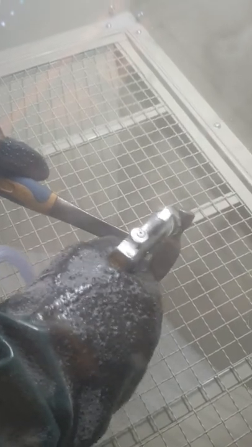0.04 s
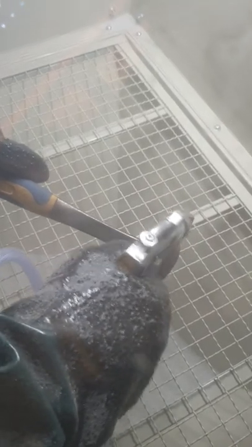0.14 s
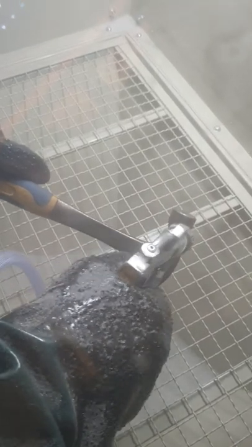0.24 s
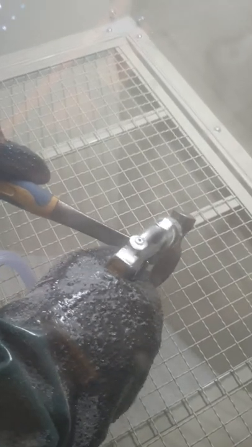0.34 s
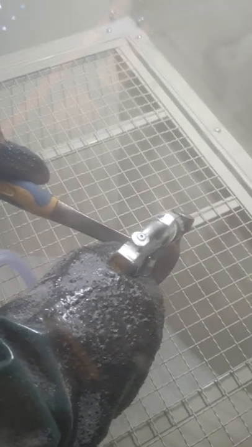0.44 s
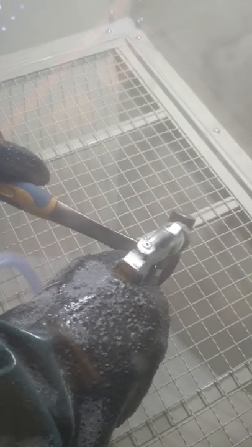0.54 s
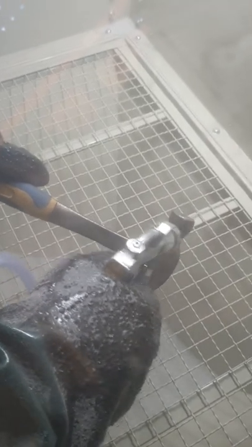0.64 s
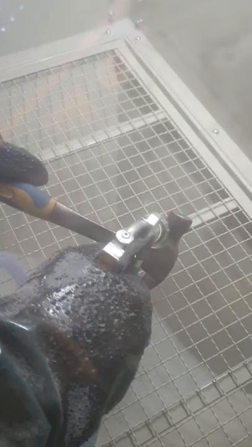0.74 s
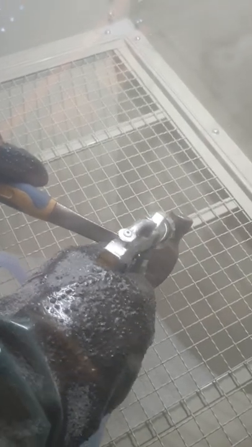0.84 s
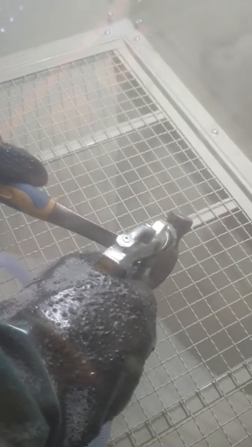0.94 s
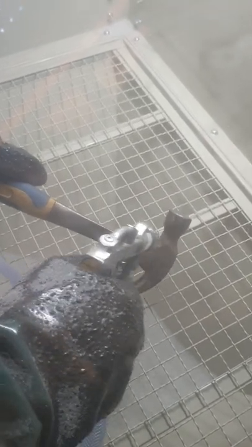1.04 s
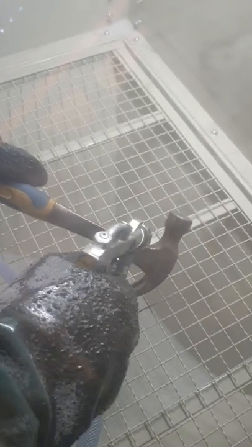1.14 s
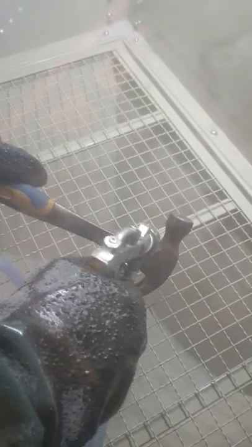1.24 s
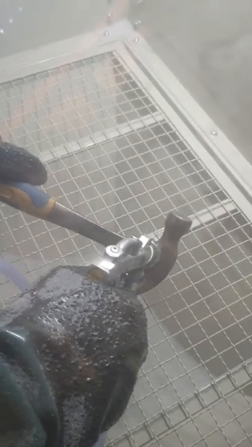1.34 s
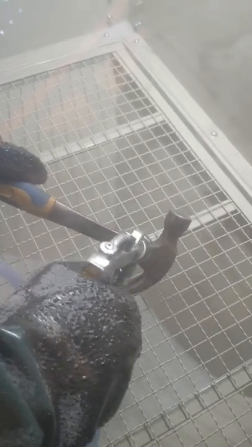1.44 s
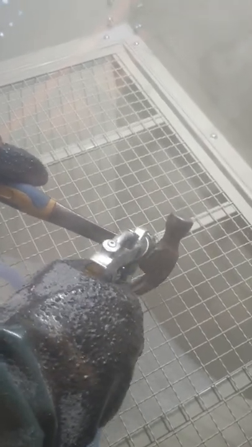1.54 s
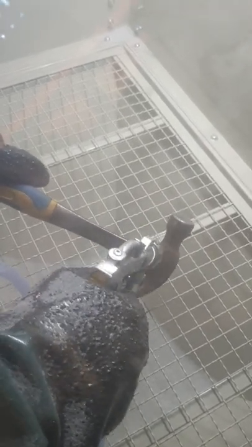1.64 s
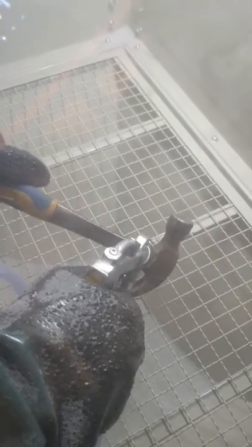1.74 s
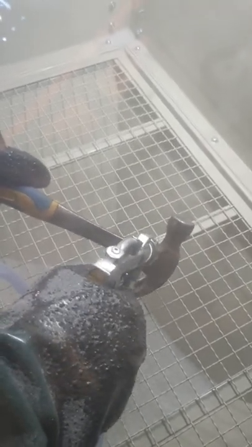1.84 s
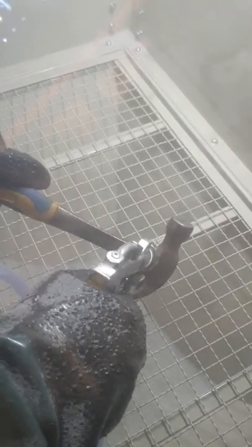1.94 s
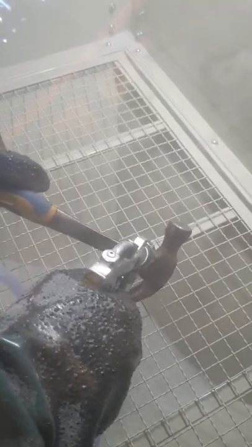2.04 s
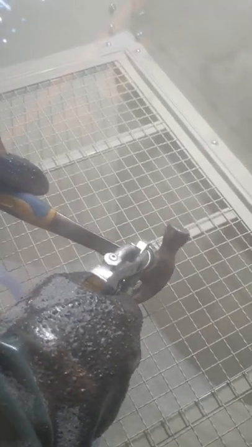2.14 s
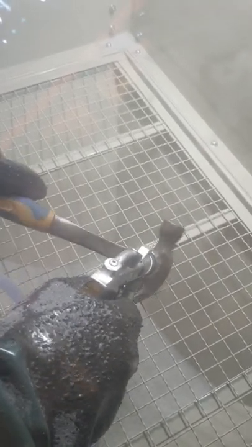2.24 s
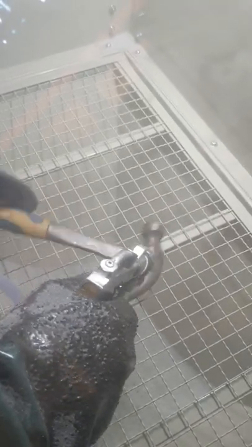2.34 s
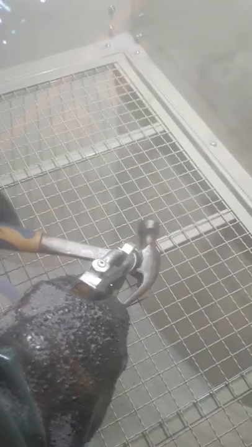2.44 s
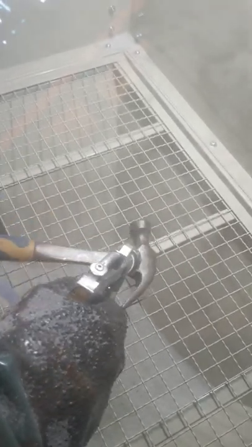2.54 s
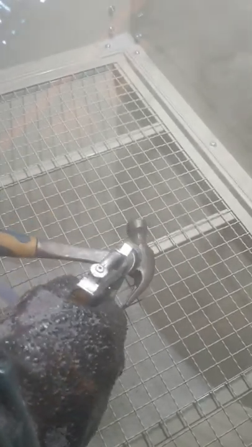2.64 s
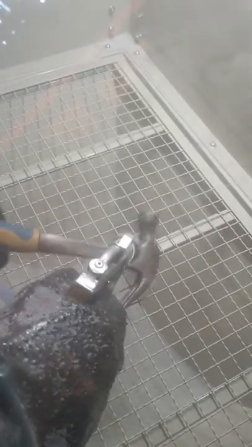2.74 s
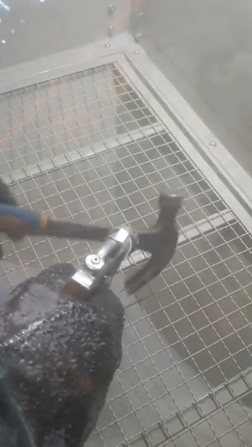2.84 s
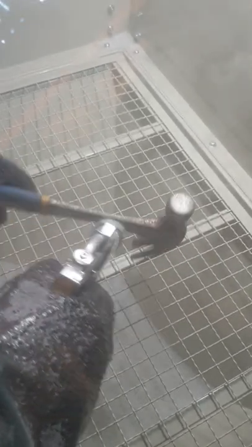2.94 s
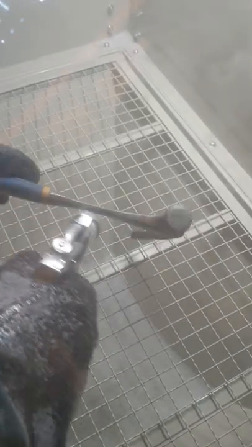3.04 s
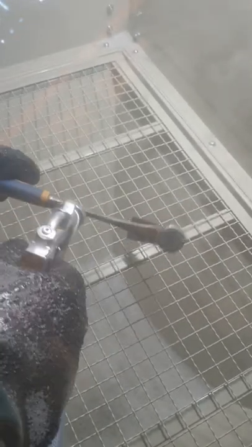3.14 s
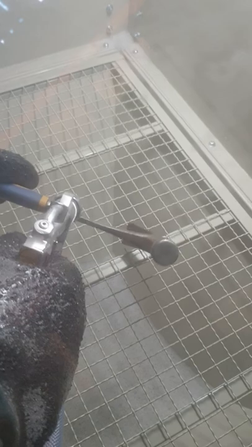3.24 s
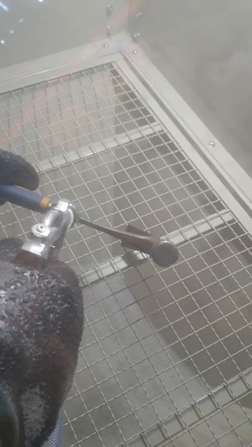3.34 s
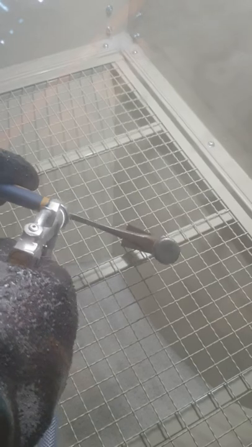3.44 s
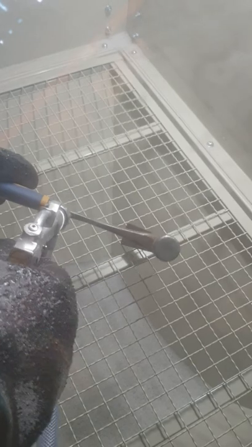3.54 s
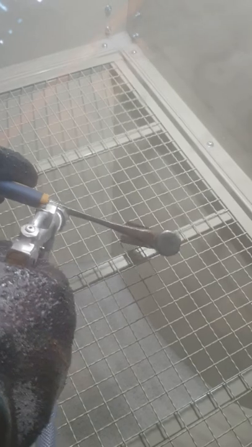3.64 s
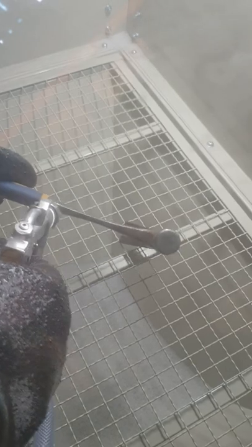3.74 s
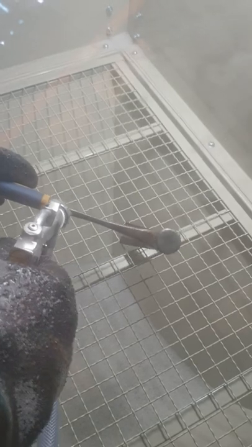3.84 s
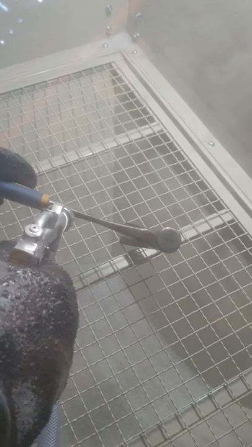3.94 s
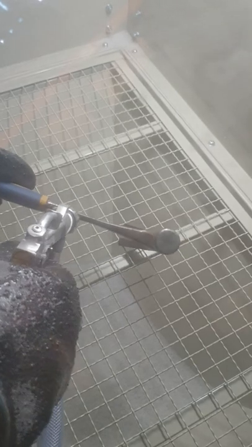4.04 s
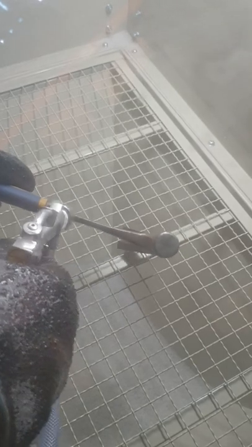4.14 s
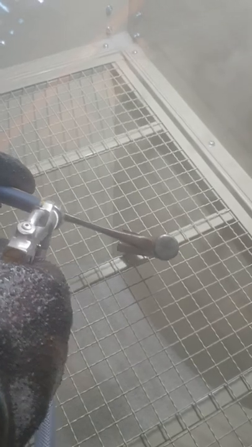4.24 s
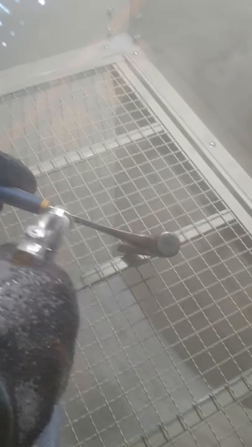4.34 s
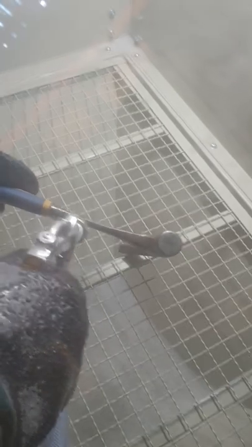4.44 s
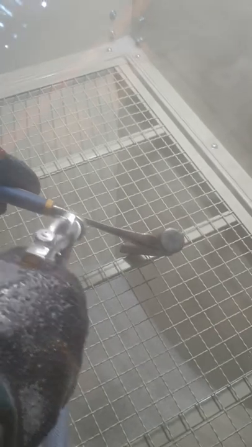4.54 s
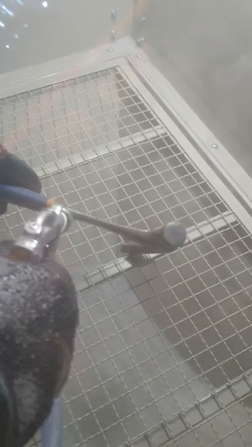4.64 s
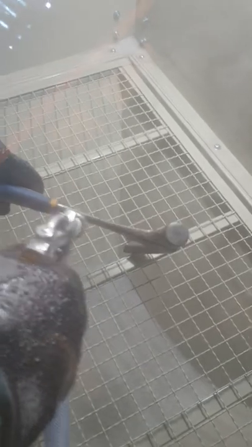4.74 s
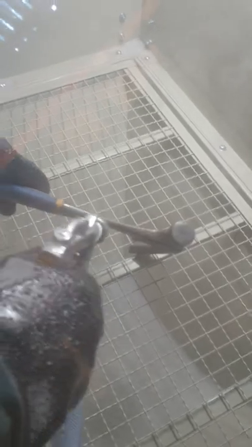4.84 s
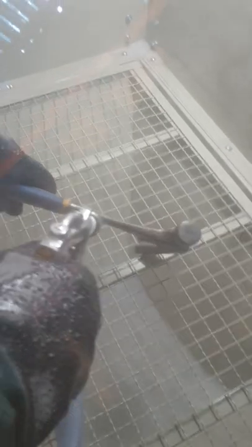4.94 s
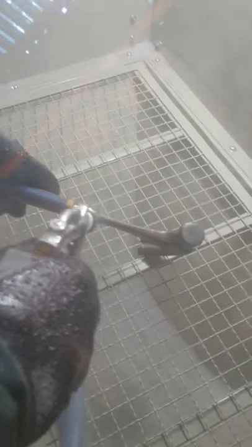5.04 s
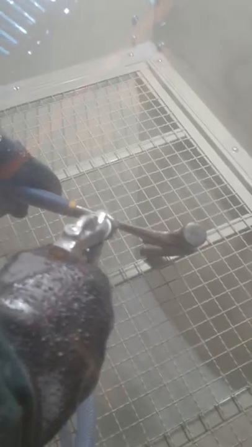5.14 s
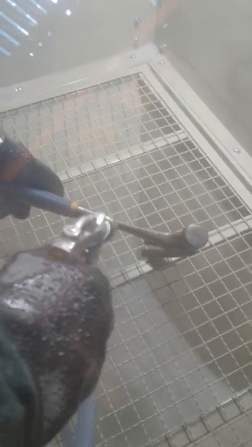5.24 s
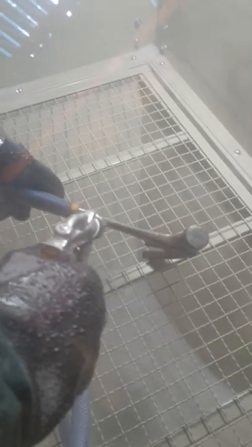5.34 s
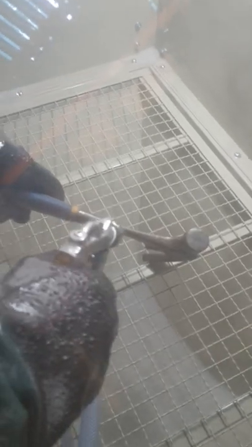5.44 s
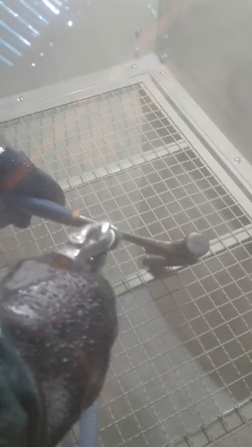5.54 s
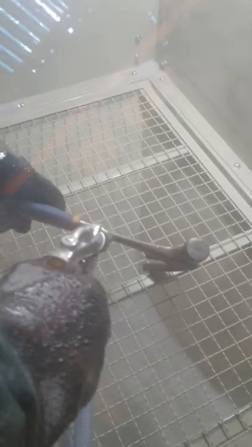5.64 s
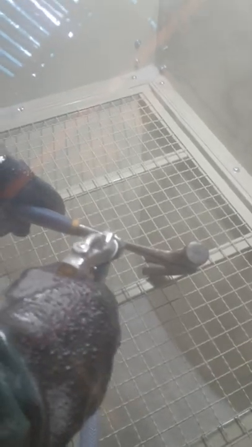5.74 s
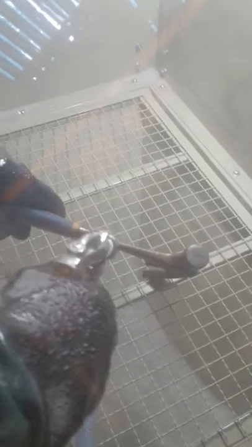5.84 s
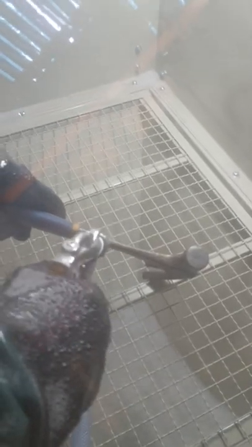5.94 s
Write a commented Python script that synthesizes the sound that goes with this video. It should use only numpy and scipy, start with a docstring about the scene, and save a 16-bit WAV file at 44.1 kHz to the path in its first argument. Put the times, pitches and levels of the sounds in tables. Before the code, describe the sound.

Inside a sheet-steel blast cabinet, a gun sprays air and abrasive over a hammer: a bright, surging hiss with gritty sizzle and dull wall drumming. It cuts off just after two seconds; the hammer bumps the grate with a deep hollow boom and rattle, grit trickles, then the jet returns until the end. Stereo, low workshop rumble beneath.

```python
"""Inside a sheet-steel blast cabinet in a workshop, heard from outside by a two-port microphone.
A blast gun sweeps over a steel tool: shaped noise hisses, drums on the walls and ticks as grit on steel.
The trigger is let go for a second, the tool bumps the grate so that decaying panel tones boom and
noise bursts rattle, spent grit trickles down as dense ticks, then the jet starts again.
Low workshop rumble of shaped noise lies under it all."""
import sys
import numpy as np
from scipy import signal
from scipy.fft import rfft, irfft, next_fast_len
from scipy.io import wavfile
from scipy.ndimage import uniform_filter1d, map_coordinates

SR = 44100
rng = np.random.default_rng(int(sys.argv[2]) if len(sys.argv) > 2 else 0)


def attenuation_scalar(level_db):
    """Turn a level in dB into a linear amplitude multiplier (20 dB per decade)."""
    decades = np.asarray(level_db, float) / 20
    return 10 ** decades


def to_wav(s):
    """Save 16-bit WAV."""
    ch = np.atleast_2d(s).T  # columns
    pcm = np.round(np.clip(ch, -1, 1) * 32767)  # PCM
    wavfile.write(sys.argv[1], SR, pcm.astype(np.int16))


N = 264151

# colour of the nozzle hiss and of sizzling grit: (frequency [Hz], density [dB per Hz])
HISS_COLOUR = [(4400, -37), (7500, -11.5), (9070, -14), (10500, -5.5), (12500, 4), (14000, 1), (15100, 5),
               (15700, -2.5)]
# bumps on the grate: (time [s], boom level [dB], rattle level [dB], boom tilt [dB per octave])
GRATE_BUMPS = [(1.078, -50, -65.5, 3), (1.171, -54.5, -62, 7.5), (1.795, -39, -65, 4),
               (1.871, -42, -64, -3), (2.184, -33.5, -46, -1.5), (2.24, -43, -64, -1.5),
               (2.43, -16.5, -32.5, -1), (2.503, -32, -50, 0.5), (2.547, -32, -49, 1.5),
               (2.604, -30, -46.5, -3.5), (2.657, -33, -50, -1), (2.798, -36.5, -42, 2.5),
               (2.92, -37.5, -57, -1.5)]


def unit(x):
    """Scaled to rms 1."""
    return x / np.sqrt(np.mean(x ** 2) + 1e-20)


def along(points, hz):
    """(Hz, value) points read on a log frequency axis."""
    f, v = np.transpose(points)
    return np.interp(np.log(hz + 1), np.log(f + 1), v)


def wobble(rate_hz):
    """A smooth random curve, rate_hz knots a second."""
    knots = rng.standard_normal(int(N * rate_hz / SR) + 4)
    return map_coordinates(knots, [np.arange(N) * rate_hz / SR])


def filtered(x, response):
    """x times a complex response of frequency."""
    m = next_fast_len(N + 8192)
    return irfft(rfft(x, m) * response(np.fft.rfftfreq(m, 1 / SR)), m)[..., :N]


def coloured(x, spectrum):
    """x given a spectrum, rms 1."""
    return unit(filtered(x, lambda hz: attenuation_scalar(along(spectrum, hz))))


def struck(start_s, db, t60_s, rise_s):
    """An envelope that rises at start_s and dies away."""
    t = np.maximum(np.arange(N) / SR - start_s, 0)
    return attenuation_scalar(db - 60 * t / t60_s) * (1 - np.exp(-t / rise_s))


def grains(share, scatter_db):
    """Dense random ticks of uneven size; share of samples holding one."""
    hits = (rng.random(N) < share) * rng.standard_normal(N)
    return hits * attenuation_scalar(scatter_db * np.minimum(rng.exponential(size=N), 4))


def inside(x, direct_db, lead_s, places):
    """A moving source in the box: a ringing tail per place; direct sound leads at the left port."""
    # ringing of the cabinet: (frequency [Hz], t60 [s])
    ringing = [(300, 0.23), (1500, 0.24), (5000, 0.15), (15000, 0.14)]
    hz, t, z = signal.stft(rng.standard_normal((places, 2, SR // 4)), SR, nperseg=256)
    decay = attenuation_scalar(-60 * t / along(ringing, hz)[:, None])
    tails = signal.istft(z * decay, SR, nperseg=256)[1]
    tails /= np.linalg.norm(tails, axis=-1, keepdims=True)
    step = N // (places - 1) + 1
    fade = np.sin(np.pi * np.arange(2 * step) / (2 * step))  # equal-power cross-fade between places
    padded = np.pad(x, (step, 2 * step))
    out = np.zeros((2, N + 3 * step + SR))
    for k, tail in enumerate(tails):
        stretch = padded[k * step:][:2 * step] * fade
        ring = signal.fftconvolve(stretch[None], tail, axes=1)
        out[:, k * step:][:, :ring.shape[1]] += ring
    direct = filtered(x, lambda f: np.exp(-2j * np.pi * f * np.array([[0], [lead_s]])))
    return (out[:, step:step + N] + attenuation_scalar(direct_db) * direct) / np.sqrt(1 + attenuation_scalar(2 * direct_db))


def shop():
    """Low rumble, nearly alike at both ports and stirred up by each bump, and a faint wide air noise."""
    # colour of the rumble: (frequency [Hz], density [dB per Hz])
    rumble_colour = [(21, -35), (35, 0), (54, 0.5), (131, -1), (235, -5), (263, -4), (360, -12), (398, -7),
                     (429, -13.5), (595, -17.5), (649, -21.5), (700, -15), (910, -40), (1540, -120)]
    # likeness of the rumble at the two ports: (frequency [Hz], correlation [-1..1])
    likeness = [(60, 0.87), (270, 0.87), (450, 0.56), (800, 0)]
    # colour of the air noise: (frequency [Hz], density [dB per Hz])
    air_colour = [(440, -31), (750, -7), (979, -11.5), (1780, -30.5), (2290, -24), (3110, -42), (4970, -29),
                  (6830, -33.5), (8590, -45), (14500, -43), (15500, -60)]
    steady_db, air_db = -47, -60
    linger_re_boom_db, linger_t60_s, linger_rise_s = -27, 3.5, .1

    def mid_side(hz):
        angle = np.arccos(np.clip(along(likeness, hz), -1, 1)) / 2
        return attenuation_scalar(along(rumble_colour, hz)) * [np.cos(angle), np.sin(angle)]

    mid, side = filtered(rng.standard_normal((2, N)), mid_side)
    level = attenuation_scalar(steady_db) + sum(struck(s, boom_db + linger_re_boom_db, linger_t60_s, linger_rise_s)
                                 for s, boom_db, _, _ in GRATE_BUMPS)
    rumble = level * attenuation_scalar(0.74 * wobble(5.3)) * unit(np.array([mid + side, mid - side]))
    return rumble + attenuation_scalar(air_db) * coloured(rng.standard_normal((2, N)), air_colour)


def trickle():
    """Spent grit patters and sizzles down the hopper, close to the wall, as dense decaying ticks."""
    # falls after the jet stops, at each jolt and at the touch of the trigger:
    # (time [s], patter level [dB], sizzle level [dB], t60 [s])
    falls = [(2.22, -54, -52, 1.5), (2.29, -62, -42, .03), (2.4, -53, -66, .5), (2.426, -44, -42, .2),
             (2.498, -58, -42, .03), (2.543, -49, -62, .45), (2.656, -56, -68, .2), (2.79, -50, -63, .5),
             (3.167, -62, -48, .1)]
    # colour of the patter: (frequency [Hz], density [dB per Hz])
    patter_colour = [(940, -25), (1600, -6), (2080, -9.5), (2260, -4.5), (3020, -14.5), (3470, -15),
                     (4240, -14), (5230, -10), (9000, -33), (11700, -64.5), (19800, -120)]
    loosen_s = .005  # how soon a jolt sets the grit falling
    patter_env = sum(struck(s, db, t60_s, loosen_s) for s, db, _, t60_s in falls)
    sizzle_env = sum(struck(s, db, t60_s, loosen_s) for s, _, db, t60_s in falls)
    patter = patter_env * coloured(grains(0.1, scatter_db=3), patter_colour)
    sizzle = sizzle_env * coloured(grains(0.15, scatter_db=1.0), HISS_COLOUR)
    return (inside(patter, direct_db=1, lead_s=.0003, places=30)
            + inside(sizzle, direct_db=7, lead_s=.0003, places=30))


def bumps():
    """Each bump sets the panels booming, a little differently at each port, and shakes the grate."""
    # panel modes: (frequency [Hz], level [dB], t60 [s])
    panels = [(59.07, -4.5, 1.44), (73.7, -11.5, 0.98), (89, -1, 0.63), (108, 3, 0.36), (129, -9, 0.17),
              (153, -11.5, 0.56), (199.7, -6, 0.32), (229.4, -9.5, 0.75), (256.4, -2.5, 0.64),
              (281.6, -4, 0.38), (332.5, -10.5, 0.39), (387, -12, 0.27), (463, -14, 0.5),
              (480, -19.5, 0.33), (593, -13, 0.18), (737, -27, .15), (830, -15, 0.19), (971, -16, 0.2),
              (1200, -27, 0.17), (1290, -33, 0.13)]
    # colour of the shaken grate: (frequency [Hz], density [dB per Hz])
    rattle_colour = [(350, -31), (600, -5.5), (854, -5), (983, -11), (1150, -4.5), (1560, -22.5),
                     (2000, -20), (2600, -50), (4400, -120)]
    boom, shake, t = np.zeros((2, N + SR)), np.zeros(N + SR), np.arange(SR) / SR
    hz, db, t60_s = np.transpose(panels)[:, :, None]
    build_up = 1 - np.exp(-t / (0.0055 + 0.84 / hz))  # big slow panels take longer to get going
    for s, boom_db, rattle_db, tilt_db in GRATE_BUMPS:
        start = round(s * SR)
        # a hard-bent panel starts sharp and sags in pitch
        ahead_s = 0.553 * attenuation_scalar(boom_db) * 0.0493 * (1 - np.exp(-t / 0.047))
        # loose seams blur each tone
        walk = np.cumsum(rng.normal(0, .16, (len(panels), 441)), axis=1)
        drift = uniform_filter1d(np.repeat(walk, 100, axis=1), size=100)
        phase = rng.normal(0, 1.2, hz.shape) + rng.normal(0, 0.6, (2, *hz.shape))
        mode_db = boom_db + db + tilt_db * np.log2(hz / 130) + rng.normal(0, 2.1, (2, *hz.shape))
        envelope = attenuation_scalar(mode_db - 60 * t / t60_s) * build_up
        tones = envelope * np.sin(2 * np.pi * hz * (t + ahead_s) + phase + drift)
        boom[:, start:][:, :SR] += tones.sum(1)
        shake[start:][:SR] += attenuation_scalar(rattle_db - 60 * t / 0.38) * (1 - np.exp(-t / .002))
    rattle = shake[:N] * attenuation_scalar(1.3 * wobble(60)) * coloured(rng.standard_normal(N), rattle_colour)
    port_gain = attenuation_scalar([[-1.1], [1.1]])  # boom is stronger at the right port
    return port_gain * boom[:, :N] + inside(rattle, direct_db=4.5, lead_s=0.00035, places=20)


def valve():
    """Jet level in dB re full: it builds up to each opening and dies after each release."""
    # trigger: (valve fully open [s], let go [s])
    bursts = [(-1, 2.18), (3.228, 7)]
    open_db_per_s, shut_db_per_s = 1800, 380
    t = np.arange(N) / SR
    ramps = [np.minimum(open_db_per_s * (t - on), shut_db_per_s * (off - t)) for on, off in bursts]
    return np.max(np.minimum(0, ramps), axis=0)


def swells(column, free_db):
    """Level of one jet layer in dB: the free stream plus a lopsided bell for each pass."""
    # stream crosses an edge or face of the tool:
    # (time [s], rise [s], nozzle hiss level [dB], grit on steel level [dB])
    passes = [(.12, .11, -32, -40.5), (.332, .014, -25.5, -33.5), (.42, .04, -34, -39),
              (.542, .06, -21, -32), (.68, .015, -28, -35), (.788, .067, -20.5, -31.5),
              (.929, .05, -21.5, -34), (1.101, .04, -25, -32), (1.42, .055, -26.5, -34),
              (1.515, .013, -38, -34), (1.664, .019, -22, -29.5), (1.84, .14, -33, -34.5),
              (1.953, .015, -21, -28), (2.174, .02, -29, -33.5), (3.24, .032, -16, -26.5),
              (3.4, .05, -33, -41), (3.551, .051, -20, -28.5), (3.646, .025, -25.5, -33),
              (3.73, .045, -21, -32.5), (3.86, .04, -32, -38), (3.961, .036, -21, -28.5),
              (4.12, .06, -36, -38), (4.334, .03, -21.5, -30), (4.43, .02, -28, -34),
              (4.559, .059, -18, -27), (4.748, .078, -22.5, -33), (4.848, .058, -26, -30.5),
              (4.997, .052, -21.5, -29), (5.14, .034, -25, -32.5), (5.36, .09, -30.5, -35.5),
              (5.466, .031, -20, -31.5), (5.7, .09, -29, -34.5), (5.811, .021, -19, -31),
              (5.91, .1, -32, -35.5)]
    fall_over_rise = 1.6  # a swell fades slower than it comes
    t, power = np.arange(N) / SR, np.full(N, attenuation_scalar(2 * free_db))
    for row in passes:
        u = (t - row[0]) / row[1]
        bell = np.exp(-np.where(u > 0, u / fall_over_rise, u) ** 2)
        power = power + attenuation_scalar(2 * row[column]) * bell
    return 10 * np.log10(power)


def turned(x, spectra):
    """x in one colour before the tool is turned and in another after."""
    turn_s = 2.8
    before, after = coloured(x, spectra[0]), coloured(x, spectra[1])
    return np.where(np.arange(N) < turn_s * SR, before, after)


def spread(make, spots, direct_db, places):
    """The stream sounds from several unrelated spots at once, each with its own path through the box."""
    return sum(inside(make(), direct_db, .0003, places) for _ in range(spots)) / np.sqrt(spots)


def gun():
    """Air shears at the nozzle, grains strike the steel by the thousand, the stream drums on the walls."""
    # colours of grit on steel before and after the turn, each: (frequency [Hz], density [dB per Hz])
    grit_colours = [(1060, -39), (1800, -14.5), (2170, -6.5), (2340, -7), (2490, -1.5), (2680, -5.5),
                    (2900, 0.5), (3060, -2.5), (3930, 0), (4350, -3), (5620, 1), (6830, -2.5),
                    (7550, -12.5), (9000, -9), (11700, -39), (19800, -120)], [(1060, -45), (1800, -13),
                    (2280, -10.5), (2500, 0), (2700, -4.5), (3110, -2), (3210, -4.5), (3700, -1),
                    (4210, -2), (4560, -2.5), (5110, 1), (6430, -1.5), (7610, -13), (9000, -12),
                    (11700, -47), (19800, -120)]
    # colours of the drumming before and after the turn, each: (frequency [Hz], density [dB per Hz])
    drum_colours = [(210, -13), (350, -6.5), (402, -1), (506, -12), (673, -12), (727, -1), (773, -11.5),
                    (835, -2), (1020, -1.5), (1090, -2), (1250, -1), (1770, -10), (2200, -4.5),
                    (2860, -14.5), (4840, -120)], [(210, -34), (350, -8.5), (399, -0.5), (427, -7),
                    (595, -8.5), (653, -9.5), (944, 0.5), (1100, -5.5), (1240, -1.5), (1310, -8),
                    (1440, -2), (1670, -7), (2200, -2.5), (2860, -16), (4840, -120)]
    # how squarely the spent air hits the walls as the gun is aimed about: (time [s], level [dB])
    aim = [(0, -46), (.5, -44.5), (.8, -42), (1.2, -42), (1.45, -45), (1.65, -41.5), (2.2, -42.5),
           (3.3, -45), (4.1, -44.5), (4.4, -44.5), (5.2, -46.5), (6, -48)]
    drum_follows = .4  # share of the grit's dB swings that the drumming follows
    t, valve_db = np.arange(N) / SR, valve()
    hiss_db = swells(column=2, free_db=-28.5)  # free: the stream blowing past the tool
    grit_db = swells(column=3, free_db=-40)
    drum_db = np.interp(t, *np.transpose(aim)) + drum_follows * (grit_db - grit_db.mean())
    drum_db = drum_db + 1.2 * wobble(12)
    feed = wobble(25)  # the grit feed sputters

    def hiss():
        return attenuation_scalar(valve_db + hiss_db + .3 * feed) * coloured(rng.standard_normal(N), HISS_COLOUR)

    def grit():
        return attenuation_scalar(valve_db + grit_db + 0.66 * feed) * turned(grains(.3, scatter_db=2.5), grit_colours)

    def drum():
        return attenuation_scalar(valve_db + drum_db) * turned(rng.standard_normal(N), drum_colours)

    # short waves feel every small move of the gun, long ones only the large moves
    jet = (spread(hiss, 3, direct_db=-4.5, places=60) + spread(grit, 2, direct_db=-6, places=18)
           + spread(drum, 2, direct_db=1.0, places=6))
    return attenuation_scalar(.6 * wobble(8) * np.array([[.5], [-.5]])) * jet  # the hand wanders left and right


def scene():
    """Shop, trickling grit, bumps and gun."""
    return shop() + trickle() + bumps() + gun()


def roll_off(x):
    """The treble ends steeply here."""
    return signal.sosfilt(signal.butter(12, 16860, fs=SR, output="sos"), x)


def record(dry):
    """The two ports differ in colour and lose the deepest bass and all above the band limit."""
    # left-right difference of the ports: (frequency [Hz], level [dB])
    port_difference = [(60, -4.5), (110, 2.5), (200, -3), (380, -1), (700, -5), (1290, -6), (2380, -4.0),
                       (4400, -6.5), (8120, 0.5), (15000, -2)]
    top_hz, edge_hz, bass_hz = 15770, 120, 36

    def response(hz):
        balance = attenuation_scalar(along(port_difference, hz) * np.array([[.5], [-.5]]))
        lowpass = np.sin(np.pi / 2 * np.clip((top_hz - hz) / edge_hz + .5, 0, 1)) ** 2
        return balance * lowpass / (1 + (bass_hz / (hz + 1)) ** 4)

    return roll_off(filtered(dry, response))


dry = scene()
out = record(dry)
to_wav(out)
```